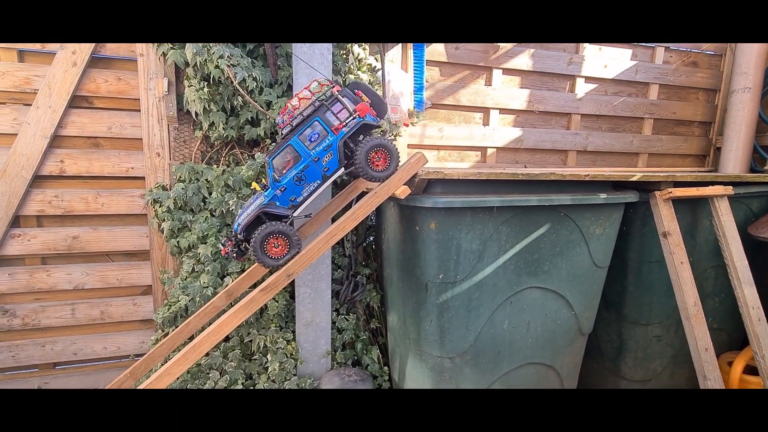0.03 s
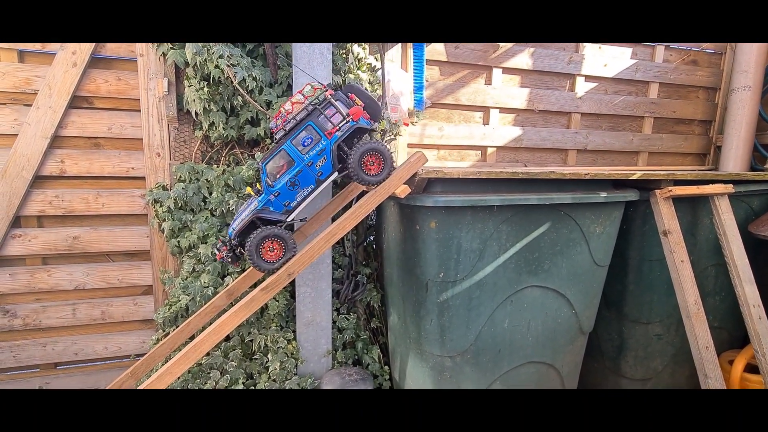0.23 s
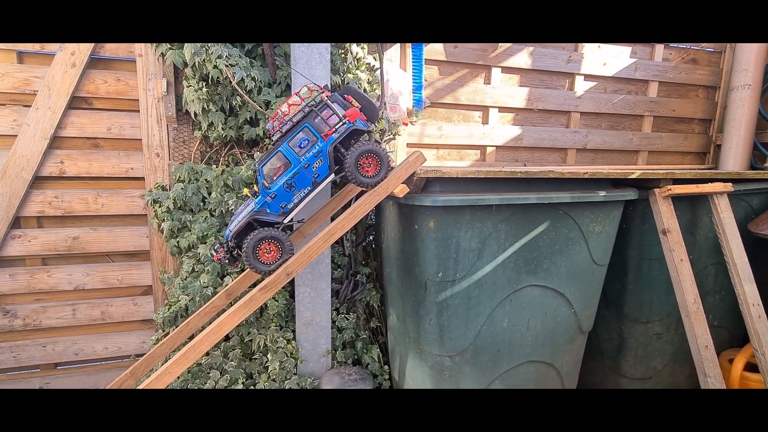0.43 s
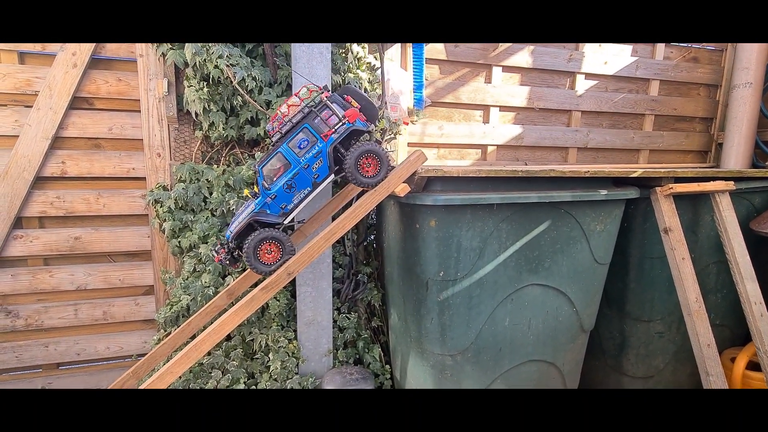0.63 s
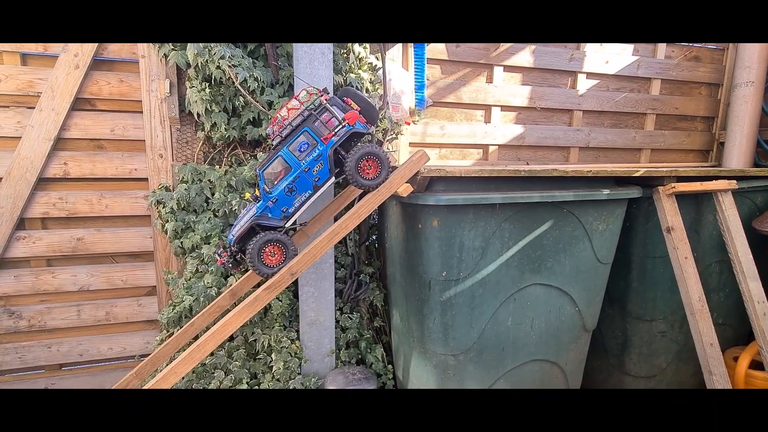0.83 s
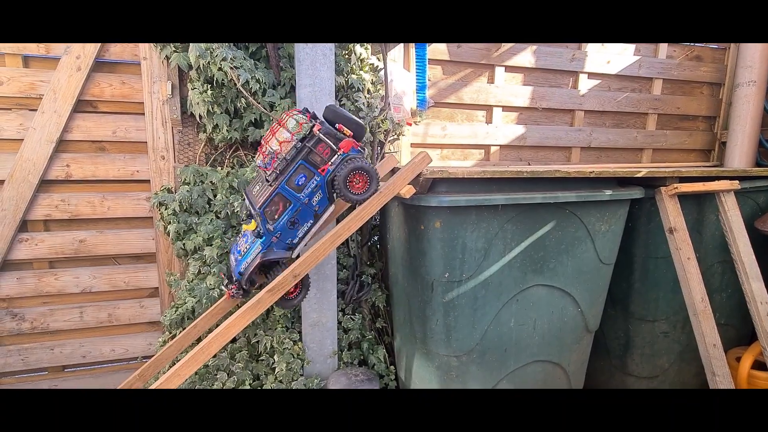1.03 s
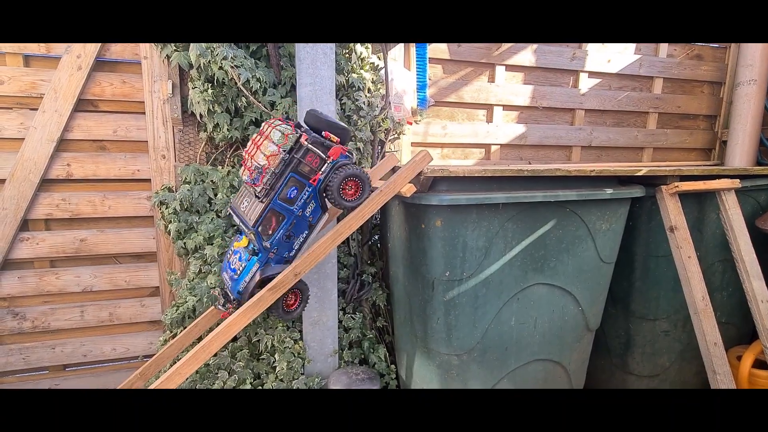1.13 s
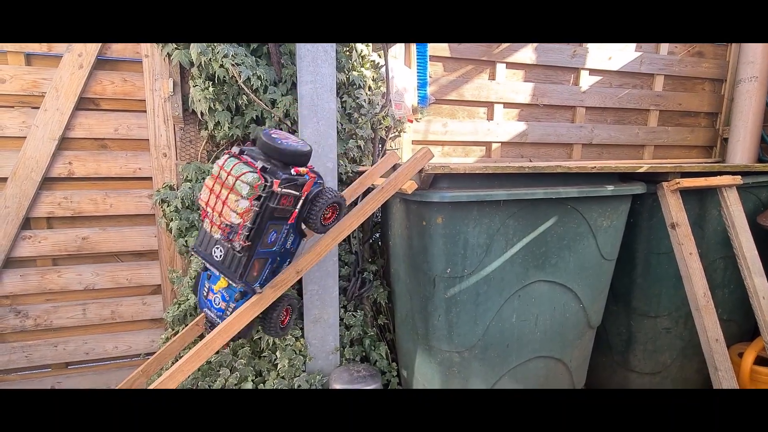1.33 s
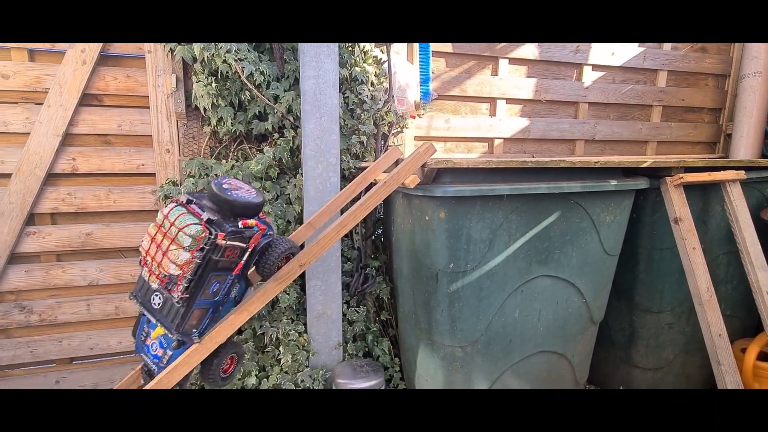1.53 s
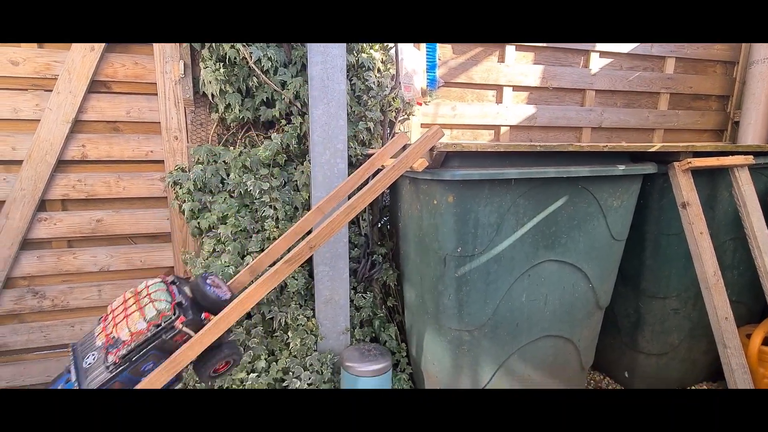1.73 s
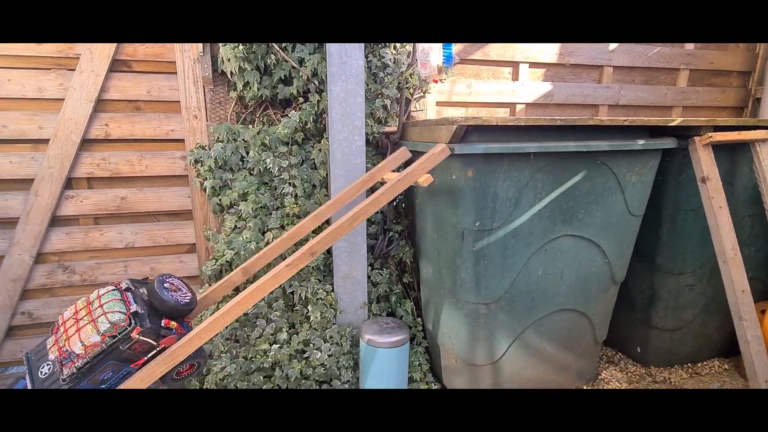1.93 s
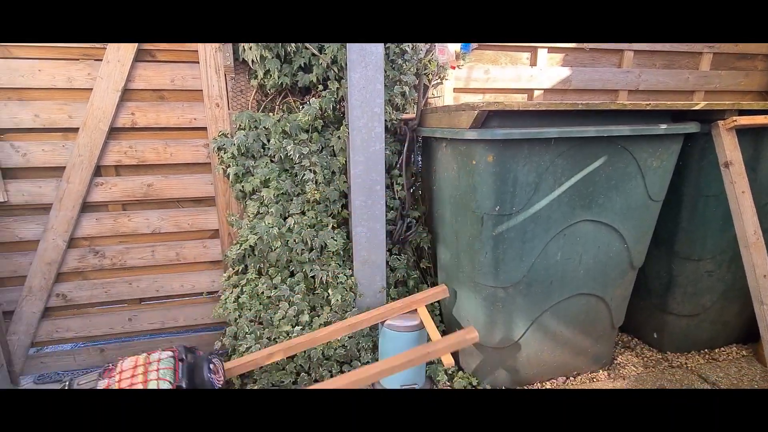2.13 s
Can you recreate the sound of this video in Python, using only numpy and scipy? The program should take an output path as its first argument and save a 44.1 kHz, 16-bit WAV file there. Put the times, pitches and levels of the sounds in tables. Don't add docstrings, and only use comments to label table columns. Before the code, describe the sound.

A toy vehicle slides down a wooden ladder ramp in a garden. Faint creaks and a thin gear whirr until 0.4 s, near quiet over low distant traffic, then a weaker whirr at 0.9 s. A sharp woody bang at 1.1 s, scraping and squeaky chatter building from 1.45, loud plastic crashes at 1.85-2.0, and a deep hollow bin boom at 2.1 s.

```python
import sys
import numpy as np
from scipy import signal
from scipy.fft import rfft, irfft, next_fast_len
from scipy.io import wavfile
from scipy.ndimage import uniform_filter1d, map_coordinates

SR = 44100
rng = np.random.default_rng(int(sys.argv[2]) if len(sys.argv) > 2 else 0)


def invert_db(x):
    u = np.asarray(x, float) / 20
    return 10 ** u


def materialize(psi):
    bounded = np.clip(np.atleast_2d(psi).T, -1, 1)
    quanta = np.round(bounded * 32767).astype(np.int16)
    wavfile.write(sys.argv[1], SR, quanta)


N = 96093
TIME = np.arange(N) / SR
LEFT_LEADS_S = 0.0001


def unit(x):
    return x / np.sqrt(np.mean(x ** 2) + 1e-20)


def along(points, hz):
    f, value = np.transpose(points)
    return np.interp(np.log(hz + 1), np.log(f + 1), value)


def curves(rows):
    s, level, *others = np.transpose(rows)
    return [np.interp(TIME, s, level, -150, -150)] + [np.interp(TIME, s, column) for column in others]


def filtered(x, response):
    size = next_fast_len(N + SR // 2)
    return irfft(rfft(x, size) * response(np.fft.rfftfreq(size, 1 / SR)), size)[..., :N]


def modes(table):
    def response(f):
        total = 0
        for k, (hz, width, db) in enumerate(table):
            total = total + (-1) ** k * invert_db(db) * 1j * f * width / (hz * hz - f * f + 1j * f * width)
        return total
    return response


def colour(points):
    return lambda f: invert_db(along(points, f))


# f/Hz, left-right likeness
LIKENESS = [(60, 0.94), (250, 1), (640, 0.76), (1400, 0.15), (4000, 0.063), (9000, 0.11)]


def pair():
    turn = lambda f: np.arccos(np.clip(along(LIKENESS, f), -1, 1)) / 2
    split = lambda f: np.array([np.cos(turn(f)), np.sin(turn(f))])
    mid, side = filtered(rng.standard_normal((2, N)), split)
    lead = lambda f: np.exp(1j * np.pi * LEFT_LEADS_S * np.array([f, -f]))
    return filtered(np.array([mid + side, mid - side]), lead)


def slips(rate, spread_db, length_s):
    draw = rng.random((2, N))
    kicks = (draw[0] < rate / SR) * invert_db(-spread_db * np.log(draw[1] + .04))
    decay = np.exp(-np.arange(600) / SR / length_s)
    return unit(signal.fftconvolve(kicks, decay)[:N] * pair())


def driven(excite, level_db, response):
    scale = np.sqrt(np.mean(filtered(excite, response) ** 2))
    return filtered(excite * invert_db(level_db), response) / scale


# f/Hz, level/dB per Hz
TRAFFIC = [(15, -38), (45, -15.5), (110, -9.5), (175, -15), (230, -19), (530, -25), (1200, -35),
           (4500, -48.5), (8000, -65)]
# t/s, level/dB
ENGINE = [(0, -60), (.25, -53.5), (.48, -57.5), (.65, -63.5), (.9, -56.5), (2.18, -37)]


def garden():
    traffic = invert_db(-59) * unit(filtered(pair(), colour(TRAFFIC)))
    engine_mode = modes([(60.6, 31, 0)])
    hum = invert_db(curves(ENGINE)[0]) * unit(filtered(pair(), lambda f: engine_mode(f) ** 2))
    hiss = invert_db(-85) * rng.standard_normal((2, N))
    return traffic + hum + hiss


# t/s, load level/dB, rattle share/dB
CREAK = [(0, -54.5, 16.5), (.07, -56, -11.5), (.15, -50.5, 4.5), (.2, -55.5, -7.5), (.24, -47, 0),
         (.31, -55, -8), (.38, -57, -18), (.7, -77.5, -6), (.92, -63.5, -4.5), (1.0, -66, 3),
         (1.09, -60.5, 6), (1.108, -45.5, 8)]
# f/Hz, width/Hz, level/dB
RAILS = [(264.3, 15.5, 2.5), (376, 33, 2.5), (494, 104, -2), (720, 120, -4), (800, 34, -3),
         (1210, 135, -12)]
# f/Hz, level/dB per Hz
KNOCK = [(90, 5.5), (300, -5), (700, -2.5), (1200, -2.5), (1850, -5), (2500, -10.5), (8000, -26.5),
         (16000, -92)]


def creak():
    load_db, rattle_db = curves(CREAK)
    tyres = driven(slips(800, 2.8, 0.0021), load_db, modes(RAILS))
    rattle = driven(slips(1500, 0.98, 0.0008), load_db + rattle_db, colour(KNOCK))
    return tyres + rattle


# t/s, peak level/dB, brightness/dB, length/s
BLOWS = [(.005, -45, -4, 0.12), (0.217, -44, -22, 0.02), (.326, -46, -36, 0.02), (.425, -60, -27, 0.017),
         (0.947, -42, -27, 0.023), (1.007, -40.5, -15.5, 0.021), (1.053, -45, -11, 0.044),
         (1.1077, -14.5, -20.5, 0.014), (1.115, -20.5, -27, 0.023), (1.1555, -26.5, 2.5, 0.025),
         (1.456, -18.5, -28, 0.024), (1.87, -5, -22, .022), (1.892, -8.5, -5.5, 0.034),
         (1.929, -13.5, -2.5, 0.027), (1.945, -5.5, -14.5, 0.019), (1.973, -16.5, -0.5, 0.021),
         (2.085, -15.5, -19.5, 0.036), (2.104, -13.5, -13, 0.042), (2.165, -26, -21, 0.033)]
# f/Hz, level/dB per Hz
GRIT = [(1470, -85), (2500, -9.5), (5250, -12.5), (6500, -9.5), (9950, -18.5), (13900, -14.5), (15600, -18),
        (16500, -67)]


def blows():
    def dying(s, db, t60):
        since = np.maximum(TIME - s, 0)
        return (1 - np.exp(-since / 0.00069)) * invert_db(db - 60 * since / t60)

    knock = sum(dying(s, db - 7, 6.77 * length) for s, db, bright, length in BLOWS)
    snap = sum(dying(s, db + bright - 0.5, 4.2 * length * 0.67) for s, db, bright, length in BLOWS)
    wood = unit(filtered(slips(3500, 5.1, 0.00038), colour(KNOCK)))
    plastic = unit(filtered(slips(5600, 5.5, 0.0006), colour(GRIT)))
    return knock * wood + snap * plastic


# t/s, push level/dB
THUDS = [(0.011, -40), (1.115, -17), (1.248, -28.5), (1.461, -33), (1.53, -24), (1.858, -29), (1.948, -20),
         (1.958, -24), (2.0971, -8), (2.111, -5.5), (2.1234, -11.5), (2.135, -27)]
# f/Hz, width/Hz, level/dB
BIN = [(77.8, 15, -3), (103.5, 7, 0.5), (158.6, 23, -8), (263, 8.8, -6.5)]


def bin_boom():
    push_s = 0.0024
    push = sum(invert_db(db + 12.5) * np.exp(-((TIME - s) / push_s) ** 2) for s, db in THUDS)
    return filtered(push, modes(BIN))


# t/s, gear load level/dB
WHIRRS = [
    [(.06, -78), (.13, -51), (.2, -49.5), (.27, -53.5), (.32, -75), (.4, -100)],
    [(.86, -90), (.89, -65.5), (.95, -65.5), (1.0, -75), (1.1, -63.5)],
]
# f/Hz, level/dB per Hz
GEARS = [(1500, -62), (2500, -9), (4000, -6.5), (6650, -5), (11000, -10), (14500, -14), (16500, -23)]


def gears():
    teeth_per_s, depth = 160, 0.18
    wander = 1 + 3 * uniform_filter1d(rng.standard_normal(N), 400)
    teeth = 1 + depth * np.sin(2 * np.pi * np.cumsum(teeth_per_s * wander) / SR)
    load = sum(invert_db(curves(rows)[0]) for rows in WHIRRS)
    case = modes([(6800, 800, 5)])
    idle = invert_db(-87.5) * unit(filtered(pair(), lambda f: case(f) ** 2))
    whirr = unit(filtered(pair() * teeth, lambda f: colour(GEARS)(f) * (1 + case(f))))
    return idle + load * whirr


# t/s, length/s, level/dB, f/Hz
CHATTER = [(0.103, 0.033, -48.5, 545), (.122, 0.06, -40, 281.7), (0.132, 0.043, -52, 1110),
           (.228, 0.1, -49, 292), (.328, 0.029, -56, 1122), (0.95, 0.033, -57.5, 268),
           (1.416, 0.062, -34, 312), (1.423, 0.07, -38.5, 792), (1.497, 0.071, -33, 329.4),
           (1.575, 0.084, -28.5, 278), (1.581, 0.098, -31.5, 371), (1.562, 0.062, -30.5, 1485),
           (1.64, 0.05, -31, 1470), (1.668, 0.14, -35, 267), (1.709, 0.16, -37, 428),
           (1.775, 0.036, -29, 1720), (1.795, 0.128, -26, 446), (1.86, 0.024, -19.5, 1536),
           (1.895, 0.034, -24.5, 1240), (1.895, 0.048, -25, 1848), (1.953, 0.0425, -28.5, 403),
           (1.655, 0.04, -36, 2210), (1.735, 0.048, -35.5, 2050), (.326, 0.032, -54, 654),
           (.418, 0.021, -59, 291), (1.46, 0.029, -36, 561), (1.875, 0.052, -24.5, 478),
           (2.12, 0.023, -23, 256), (1.69, 0.053, -33.5, 1424)]


def chatter():
    glide, edge = 0.59, 0.29
    size = SR // 4
    out, rough = np.zeros((2, N + SR)), slips(1500, 2, .0015)
    t, f = np.arange(size) / SR, np.fft.rfftfreq(size, 1 / SR)
    for k, (s, length, db, hz) in enumerate(CHATTER):
        excite = rough[:, k * 2500:][:, :size]
        resonance = modes([(hz, 27 + 0.044 * hz, 0)])(f)
        ring = irfft(rfft(excite) * resonance ** 2, size)
        ring = ring / np.abs(signal.hilbert(ring)) ** 0.57
        warp = np.clip(t + glide * t * (t - length) / 2 + .03, 0, t[-1]) * SR
        fade = np.clip(np.minimum(2 * t, length - t) / length / edge, 0, 1)
        line = fade * np.array([map_coordinates(side, [warp]) for side in ring])
        even = np.sqrt(length * SR / np.mean(np.sum(line ** 2, 1)))
        out[:, round(s * SR):][:, :size] += invert_db(db) * line * even
    return out[:, :N]


# t/s, peak level/dB, f/Hz, t60/s
TAPS = [(.3265, -47, 1116, 0.041), (.9485, -37, 284, 0.03), (.949, -47, 1850, 0.028),
        (.967, -50, 900, 0.016), (1.0125, -46, 1230, 0.022), (1.049, -49, 1090, 0.033),
        (1.066, -41, 483, 0.032), (1.108, -33, 610, .05), (1.1105, -17, 1167, 0.048),
        (1.112, -20, 1950, 0.047), (1.118, -14.5, 1385, 0.037), (1.119, -25.5, 853, 0.11),
        (1.131, -15, 1410, 0.016), (1.15, -22.5, 306, .06), (1.4195, -35, 775, .04),
        (1.454, -23.5, 690, .04), (1.464, -32, 1370, 0.035), (1.477, -22, 2880, 0.04),
        (1.478, -28, 3210, 0.03), (1.519, -35, 1400, 0.031), (1.584, -19, 1463, 0.031),
        (1.663, -22, 1644, 0.059), (1.664, -23.5, 3450, .04), (1.684, -27.5, 3470, .05),
        (1.685, -27, 3740, 0.061), (1.686, -33, 4280, 0.036), (1.705, -21, 1454, 0.08),
        (1.787, -23, 1693, .09), (1.846, -15, 1220, 0.021), (1.855, -24, 93, .1), (1.872, -13, 1464, 0.034),
        (1.877, -12, 1354, .04), (1.887, -11, 1252, 0.035), (1.895, -18, 502, 0.12),
        (1.908, -15.5, 548, 0.074), (1.921, -15, 1154, 0.062), (1.93, -12.5, 1838, 0.033),
        (1.931, -12, 3133, 0.049), (1.941, -20, 1116, 0.026), (1.943, -14.5, 143, 0.069),
        (1.9495, -12.5, 1147, 0.033), (1.958, -13, 154, 0.037), (1.974, -14, 1840, 0.017),
        (1.982, -15.5, 420, .05), (2.088, -22.5, 823, 0.077), (2.0885, -11.5, 285, 0.034),
        (2.0945, -12, 87.5, 0.062), (2.119, -16.5, 434, 0.044), (2.139, -16.5, 380, 0.062)]


def taps():
    rise_s, click_t60_s = 0.00021, 0.0024
    out, t = np.zeros((2, N + SR)), np.arange(SR // 5) / SR
    delay = np.array([[0], [LEFT_LEADS_S]])
    for s, db, hz, t60 in TAPS:
        lean_db = np.array([[1], [-1]]) * rng.standard_normal()
        ring = np.sin(2 * np.pi * hz * (t - delay)) * invert_db(-60 * t / t60 + lean_db)
        click = 0.22 * min(hz / 1500, 1) * invert_db(-60 * t / click_t60_s) * rng.standard_normal((2, len(t)))
        out[:, round(s * SR):][:, :len(t)] += invert_db(db) * (1 - np.exp(-t / rise_s)) * (ring + click)
    return out[:, :N]


# t/s, pressure level/dB, grit share/dB
SLIDE = [(1.108, -62, -9), (1.13, -32, -15.5), (1.22, -42.5, -7.5), (1.27, -37, -7.5), (1.33, -39.5, -15),
         (1.4, -49.5, -9.5), (1.452, -43.5, -10), (1.459, -29, -16), (1.51, -35, -10.5),
         (1.545, -30.5, -15.5), (1.62, -35, -16), (1.7, -32, -13), (1.8, -28, -12), (1.87, -22, -13),
         (1.98, -27, 0.5), (2.02, -31.5, -9), (2.075, -40, -1), (2.179, -29.5, -12.5)]
# f/Hz, level/dB per Hz
WOOD = [(35, -21), (200, -10.5), (280, -17.5), (920, -15.5), (1470, -12), (3300, -19), (6000, -34),
        (13000, -100)]


def slide():
    press_db, grit_db = curves(SLIDE)
    rails = driven(slips(860, 0.5, 0.0011), press_db, modes(RAILS))
    wood = driven(slips(2000, 3.4, 0.015), press_db + 1.5, colour(WOOD))
    grit = driven(slips(3300, 2.0, 0.0021), press_db + grit_db, colour(GRIT))
    return rails + wood + grit


# f/Hz, t60/s
YARD = [(100, 0.83), (1000, 0.34), (4000, 0.092), (12000, 0.1)]


def yard(x):
    hz, t, z = signal.stft(rng.standard_normal((2, SR // 3)), SR, nperseg=256)
    tail = signal.istft(z * invert_db(-60 * t / along(YARD, hz)[:, None]), SR, nperseg=256)[1]
    late = np.pad(x, ((0, 0), (300, 0)))
    return signal.fftconvolve(late, tail / np.linalg.norm(tail[0]), axes=1)[:, :N]


def ports(f):
    left_db = 1.1 + 1 * f / np.hypot(f, 6000)
    return invert_db(np.outer([.5, -.5], left_db)) * f ** 2 / np.hypot(f ** 2, 68 ** 2)


def scene():
    toy = creak() + blows() + bin_boom() + gears() + chatter() + taps() + slide()
    answer = filtered(yard(toy), lambda f: f / np.hypot(f, 680))
    return garden() + filtered(toy + invert_db(-9) * answer, ports)


def top_cut(x):
    return signal.sosfilt(signal.butter(12, 16800, fs=SR, output="sos"), x)


def record(dry):
    mix = dry / (1 + np.abs(dry / .95) ** 4) ** 0.41
    return top_cut(mix)


dry = scene()
out = record(dry)
materialize(out)
```